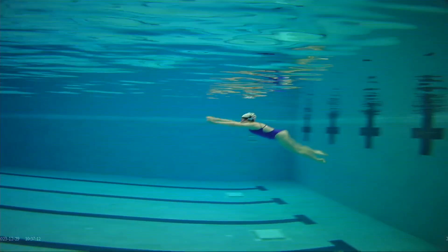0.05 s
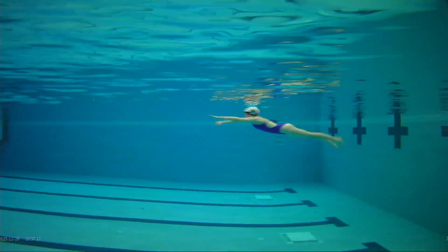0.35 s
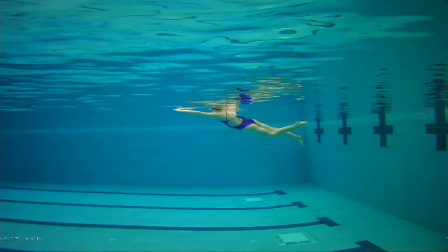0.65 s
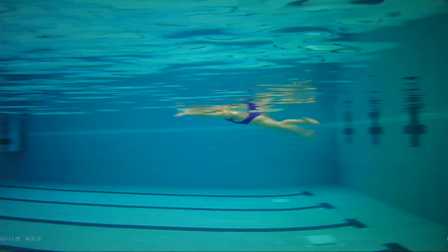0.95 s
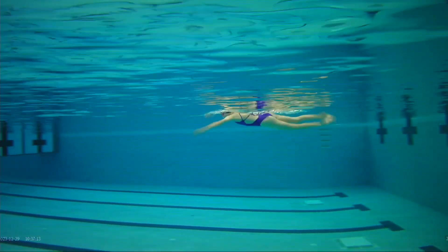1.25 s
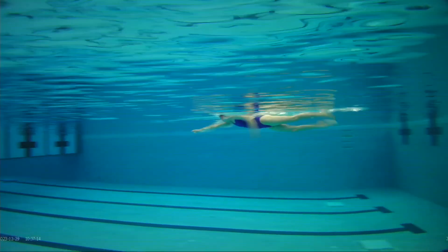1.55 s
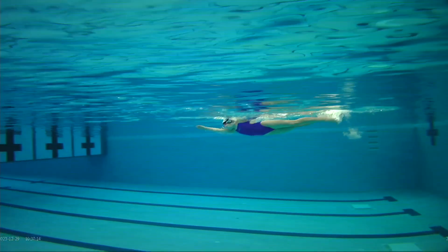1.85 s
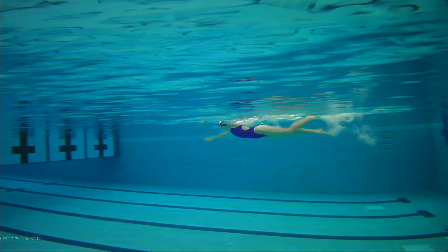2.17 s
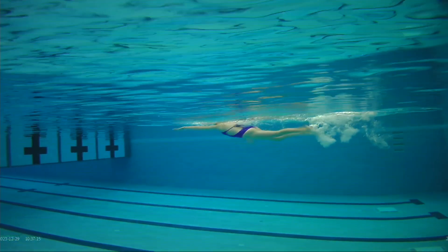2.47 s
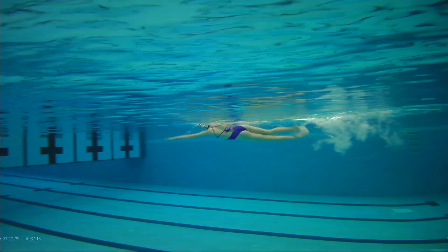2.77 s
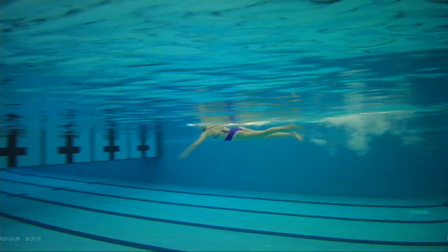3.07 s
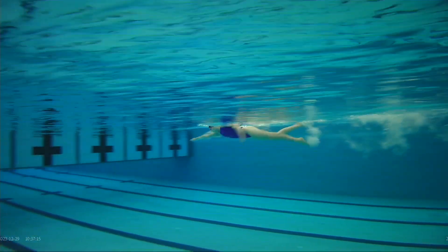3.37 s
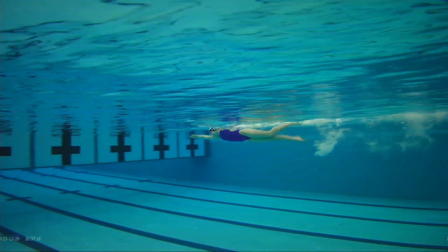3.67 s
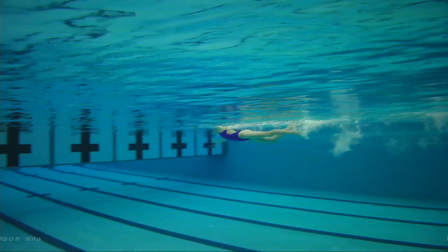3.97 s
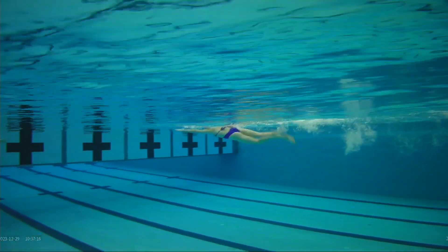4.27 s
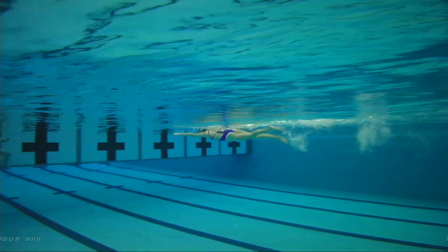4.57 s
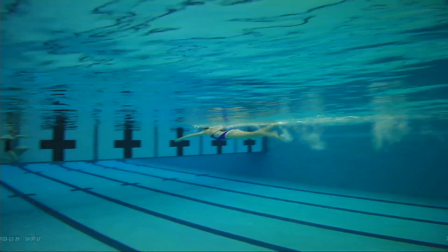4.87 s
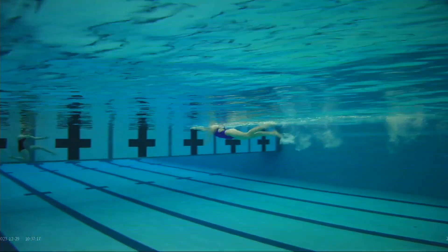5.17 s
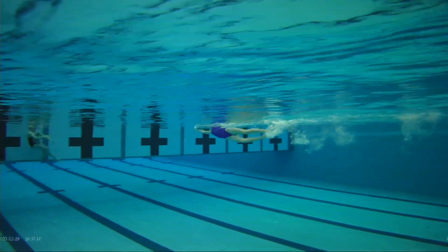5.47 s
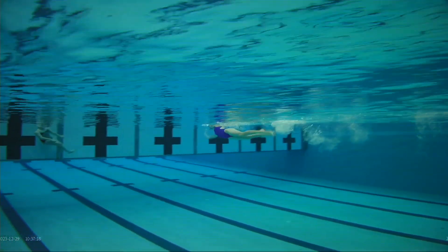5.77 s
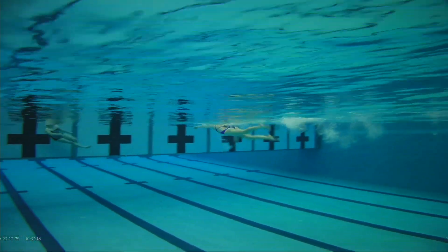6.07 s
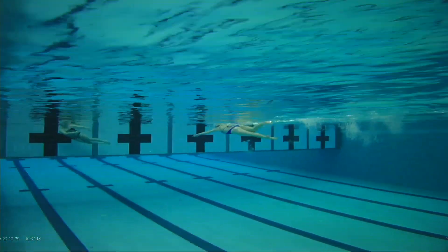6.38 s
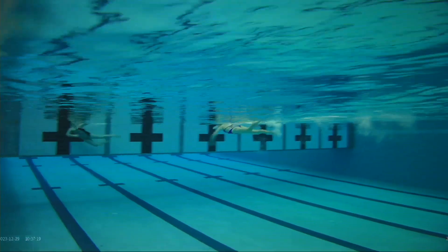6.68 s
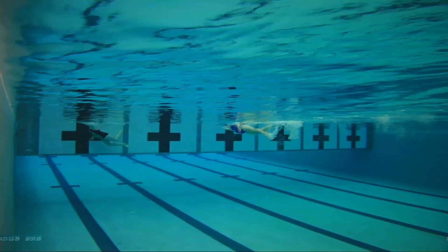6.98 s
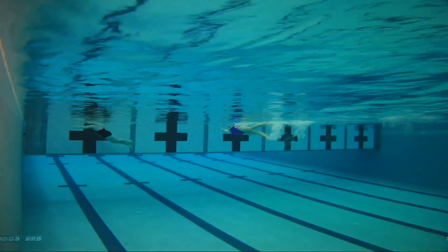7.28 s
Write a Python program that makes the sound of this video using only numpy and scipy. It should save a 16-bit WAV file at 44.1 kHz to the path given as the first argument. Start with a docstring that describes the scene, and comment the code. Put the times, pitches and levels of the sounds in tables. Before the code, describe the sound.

A swimmer's crawl heard from under water, bubbles gulping and fizzing over a low rumble and a wavering pump hum.

```python
"""A low pool rumble and the hum of a circulation pump, heard under water through a camera housing.
The hum swells and fades as the camera drifts. About a second in, a swimmer's crawl starts beating
clouds of ringing bubbles into the water: they gulp, churn, froth and fizz. Kicks slap and leave
air pockets throbbing, small splashes tick at the surface and single large bubbles gloop.
Bubbles and ticks echo round the tiled basin, over a faint camera hiss."""
import sys
import numpy as np
from scipy import signal
from scipy.fft import rfft, irfft, next_fast_len
from scipy.io import wavfile
from scipy.ndimage import map_coordinates

SR = 44100
rng = np.random.default_rng(int(sys.argv[2]) if len(sys.argv) > 2 else 0)


def pcm_store(signal):
    """Save signal as 16-bit PCM."""
    levels = np.round(np.clip(np.atleast_2d(signal), -1, 1) * 32767)
    wavfile.write(sys.argv[1], SR, levels.astype(np.int16).T)


N = 332073

# Tone colour of each noise layer, low to high: frequency_hz, relative_db
SURGE_EQ = [(8, -11.5), (25, 5), (55, -1.5), (90, -4), (200, -44)]
RUMBLE_EQ = [(15, -9), (50, 1), (100, -0.5), (140, -2.5), (200, -4), (285, -4.5), (340, -7), (570, -7.5),
             (720, -14), (1100, -17), (1350, -20), (1800, -21.5), (2500, -30.5), (4000, -36.5),
             (8000, -64.5)]
GULP_EQ = [(60, -21.5), (125, 2.5), (280, 1.5), (325, -5), (420, -1.5), (570, -5.5), (750, -10.5),
           (1500, -41.5)]
CHURN_EQ = [(300, -25.5), (550, -11), (720, -0.5), (920, -0.5), (1080, -5), (1300, -12.5), (2000, -27.5)]
FROTH_EQ = [(700, -20), (1050, -0.5), (1300, 1.5), (1850, -2.5), (2200, -10), (3000, -18.5), (6000, -41)]
SPRAY_EQ = [(1200, 1), (2400, 6), (3200, 3), (4200, -1), (5500, -2), (7000, -3.5), (8000, -20)]
HISS_EQ = [(1000, -5), (4000, -4), (5000, 4), (6300, 5), (7000, -2), (7600, -19.5)]
# Fader ride for water pushing on the housing: time_s, relative_db
SURGE_RIDE = [(0, -47.5), (.9, -50), (1.6, -54), (2.15, -48.5), (2.8, -52.5), (3.4, -53.5), (3.95, -54.5),
              (4.3, -54), (5.75, -49.5), (6.4, -50.5), (7.08, -55), (7.15, -44.5), (7.27, -53.5),
              (7.53, -48.5)]
# Fader rides for the pump's hum and its weaker shaft tone an octave below: time_s, level_db
HUM_RIDE = [(0, -60), (.55, -54.5), (1.06, -49), (1.22, -47), (1.38, -51.5), (1.58, -47.5), (1.74, -60.5),
            (1.87, -49.5), (1.95, -59), (2.16, -43), (2.36, -48.5), (2.54, -46), (2.67, -64), (2.78, -47),
            (3.0, -53.5), (3.14, -50.5), (3.35, -47), (3.95, -47.5), (4.8, -50), (5.02, -63), (5.16, -42.5),
            (5.45, -47.5), (6.1, -60.5), (6.3, -46.5), (6.65, -50.5), (6.78, -58.5), (6.9, -47), (7.1, -52),
            (7.53, -54)]
SHAFT_RIDE = [(0, -58), (1.6, -52.5), (2.15, -53.5), (2.9, -61), (3.7, -51.5), (3.94, -72), (4.1, -52),
              (4.5, -47.5), (4.7, -60), (6.6, -62.5), (7.2, -56), (7.53, -52)]
# Fainter machine tones: pitch_hz, relative_db
WHINES = [(98.5, -60), (119.5, -60), (238, -63), (278, -62), (388, -64), (418, -64), (545, -66), (994, -69),
          (1867, -72.5)]
# Flurries of strokes and kicks, 0 dB being a full flurry:
# start_s, length_s, gulp_db, churn_db, froth_db, spray_db
FLURRY_CUES = [(0.952, 0.49, -15, -17, -10.5, -8), (1.387, 0.23, -10, -4, -7, -2.5),
               (1.588, 0.14, -5, -6, -3.5, -3.5), (1.77, 0.16, -7, -1, -1, -2.5),
               (2.017, 0.18, 1, -1.5, -1, -3), (2.238, 0.18, 0, -3.5, -2.5, -.5),
               (3.006, 0.2, -10.5, -5, -15, -15.5), (3.206, 0.081, -17, -6, -6.5, -5.5),
               (3.298, 0.08, -7.5, 1, 0, -0.5), (3.425, 0.24, -6, -1, -4.5, -3.5),
               (3.74, 0.4, -1.5, -1.5, -4, -5), (4.264, 0.13, -4, -1, -1, -5.5),
               (4.581, 0.11, -8, -12, -10, -3), (4.948, 0.53, -7, -5, -8, -7.5),
               (5.408, 0.12, -8, -6.5, -5.5, -6), (5.975, 0.034, -10, -22, -18, -7.5),
               (6.212, 0.065, -1, -7, -11, -7), (6.758, 0.1, 0.5, 1.5, -.5, -1),
               (6.934, 0.16, 1, -8, -1.5, -1.5), (7.158, 0.098, -3, -6.5, 1.5, -2),
               (7.455, .07, -4, -6, -9, -10)]
# Decay of the basin's echo: frequency_hz, t60_s
BASIN_DECAY = [(100, 0.61), (1000, 0.38), (7000, 0.37)]
# Kicks that trap air: start_s, slap_relative_db, slap_pitch_hz, pocket_db, pocket_pitch_hz, pocket_t60_s
KICK_CUES = [(1.075, -42.5, 800, -56, 137, 0.51), (1.628, -36.5, 237, -41, 139, .2),
             (1.787, -43, 1320, -49, 110, 0.28), (2.049, -34, 403, -38, 69, 0.37),
             (2.115, -41.5, 290, -40, 111, 0.17), (2.325, -41, 740, -48, 136, 0.33),
             (3.35, -43, 880, -41, 72.7, 0.6), (3.384, -44, 467, -40, 152, 0.16),
             (3.595, -40, 290, -44, 138, .3), (3.985, -39, 620, -48, 137, .3),
             (4.283, -38, 600, -63, 77.4, 0.32), (4.36, -43, 710, -54, 75.5, .4),
             (5.184, -36, 248, -48, 129, 0.38), (5.559, -52, 300, -36, 140, 0.49),
             (6.737, -35.5, 269, -63, 132, .3), (6.84, -38.5, 516, -40, 98, 0.43),
             (7.116, -40, 300, -31, 64.5, 0.42), (7.197, -35, 330, -49, 71, .2),
             (7.236, -35, 210, -31.5, 132, 0.25), (7.339, -38, 230, -51, 130, .2)]
# Small splashes at the surface: start_s, pitch_hz, ring_db, crack_db, t60_s
TICK_CUES = [(1.448, 5170, -47, -50, 0.016), (1.48, 4870, -52, -52.5, 0.018),
             (1.49, 5130, -53, -53.5, 0.023), (1.498, 4600, -52.5, -54, .02),
             (1.682, 6920, -55.5, -55.5, 0.017), (1.873, 2300, -45.5, -59, .02),
             (2.249, 3670, -46.5, -47.5, .011), (3.074, 2580, -52, -57.5, .014),
             (3.217, 6520, -54, -49.5, 0.012), (3.268, 6980, -52.5, -64.5, 0.012),
             (4.361, 2090, -46, -52, 0.0094), (5.974, 2410, -52.5, -60, 0.028),
             (6.017, 2420, -50, -53.5, .026), (6.22, 2640, -48.5, -57.5, 0.014),
             (6.25, 2820, -52, -51.5, 0.017)]
# Single large bubbles: start_s, length_s, start_pitch_hz, end_pitch_hz, level_db
GLOOP_CUES = [(1.624, .045, 301, 215, -44.5), (1.665, 0.094, 113, 87, -42.5), (1.85, .06, 1320, 1386, -56),
              (1.965, 0.053, 269, 302, -43), (2.05, 0.047, 411, 550, -49), (2.14, .04, 304, 324, -49),
              (2.415, .035, 308, 340, -45), (3.342, 0.04, 790, 1050, -50), (3.39, 0.041, 480, 442, -42.5),
              (4.445, 0.021, 560, 493, -49), (6.8, 0.067, 468, 586, -48.5), (7.102, 0.074, 324, 167, -41.5),
              (7.145, 0.035, 326, 470, -43.5)]

SHAFT_HZ = 69.4
RISE_S, CLEAR_DB_PER_S = 0.049, 27.5  # a bubble cloud builds quickly and thins as it surfaces
LINGER_DB, LINGER_DB_PER_S = -13, 0.5  # a small share of it hangs in the water
TICK_WIDTH_HZ = 150  # a splash is a knot of bubbles of nearly one size
BAND_LIMIT_HZ = 7650


def amp(db):
    """Decibels to gain."""
    return 10 ** (np.asarray(db) / 20)


def unit(x):
    """Scale to rms 1."""
    return x / np.sqrt(np.mean(x ** 2) + 1e-20)


def along(points, hz):
    """Read (frequency_hz, value) points on a log frequency axis."""
    knots_hz, values = np.transpose(points)
    return np.interp(np.log(hz + 1), np.log(knots_hz + 1), values)


def fader(ride):
    """A fader ride in dB, one value per sample."""
    return np.interp(np.arange(N) / SR, *np.transpose(ride))


def wobble(rate):
    """A smooth random curve, rate knots a second."""
    return map_coordinates(rng.standard_normal(400), [np.arange(N) * rate / SR + 2], mode="mirror")


def filtered(x, response):
    """Filter x by a gain that depends on frequency."""
    size = next_fast_len(N + 8192)
    return irfft(rfft(x, size) * response(np.fft.rfftfreq(size, 1 / SR)), size)[:N]


def coloured(x, eq):
    """x through an EQ curve, at rms 1."""
    return unit(filtered(x, lambda hz: amp(along(eq, hz))))


def add(track, start_s, sound):
    """Lay a sound into the track at its cue."""
    part = track[max(round(start_s * SR), 0):][:len(sound)]
    part += sound[:len(part)]


def water():
    """The bed: steady rumble of the whole pool, and slow surges against the housing."""
    rumble = amp(-46.5) * coloured(rng.standard_normal(N), RUMBLE_EQ)
    surge = amp(fader(SURGE_RIDE) - 1.0) * coloured(rng.standard_normal(N), SURGE_EQ)
    return rumble + surge


def tone(hz, drift_hz):
    """A machine tone of rms 1 whose pitch wanders in the moving water."""
    turns = rng.random() + np.cumsum(hz + drift_hz * wobble(7)) / SR
    return np.sqrt(2) * np.sin(2 * np.pi * turns)


def pump():
    """The pump hums at twice its shaft rate, swelling as the camera drifts through standing waves."""
    shaft = amp(fader(SHAFT_RIDE) + 0.5 * wobble(8)) * tone(SHAFT_HZ, drift_hz=2.5)
    hum = amp(fader(HUM_RIDE) + 2.0 * wobble(13)) * tone(2 * SHAFT_HZ, drift_hz=2.8)
    whine = sum(amp(db - 5.0 + 4.1 * wobble(3)) * tone(hz, drift_hz=0.97) for hz, db in WHINES)
    return shaft + hum + whine


def flurry(start_s, length_s):
    """Power envelope of one bubble cloud: it builds, holds while the limbs work, then clears."""
    age_s = np.arange(N) / SR - start_s
    release_s = np.maximum(age_s - length_s, 0)
    clearing = amp(-CLEAR_DB_PER_S * release_s) ** 2
    lingering = amp(LINGER_DB - LINGER_DB_PER_S * release_s) ** 2
    return np.clip(age_s / RISE_S, 0, 1) * (clearing + lingering)


def bubbles(low_hz, high_hz, q, spread_db, glide, count, samples):
    """Scattered ringing bubbles, each gliding up as it nears the surface."""
    when, pitch_draw, gain_draw = rng.random((count, 3)).T[:, :, None]
    hz = low_hz * (high_hz / low_hz) ** pitch_draw
    turns = hz * np.arange(samples) / SR
    age = turns / q
    ring = np.sin(2 * np.pi * turns * (1 + glide * age)) * np.exp(-np.pi * age)
    spread = np.minimum(-np.log(1 - gain_draw), np.pi)  # exponential, capped
    gain = amp(spread_db * spread) * hz / low_hz
    positions = (when * N).astype(int) + np.arange(samples)
    return unit(np.bincount(positions.ravel(), (gain * ring).ravel(), N)[:N])


def basin(x, wet_db):
    """Sound bounces between the tiles and a surface that keeps moving, so the echo keeps changing."""
    wet, block = np.zeros(N), SR // 10
    for start in range(0, N, block):
        hz, t, noise = signal.stft(rng.standard_normal(SR // 4), SR, nperseg=256)
        decay = amp(-60 * t / along(BASIN_DECAY, hz)[:, None])
        _, tail = signal.istft(noise * decay, SR, nperseg=256)
        add(wet, start / SR, signal.fftconvolve(x[start:start + block], tail / np.linalg.norm(tail)))
    return x + amp(wet_db) * wet


def cloud(near, eq, wash_db):
    """Near bubbles echo round the basin and stand out of a wash of countless far ones."""
    echoing = unit(basin(near, wet_db=-0.5))
    return coloured(echoing + amp(wash_db) * rng.standard_normal(N), eq)


def swell(power, calm_db, flurry_db):
    """Gain of a bubble layer: the flurries add their power to that of calm water."""
    return np.sqrt(amp(calm_db) ** 2 + amp(flurry_db) ** 2 * power)


def wake():
    """Each stroke drags air down: pockets gulp, bubbles churn and froth, spray fizzes."""
    gulp_power, churn_power, froth_power, spray_power = sum(
        np.outer(amp(levels_db) ** 2, flurry(start_s, length_s))
        for start_s, length_s, *levels_db in FLURRY_CUES)
    large = bubbles(111.6, 704, q=9.4, spread_db=-2.0, glide=0.031, count=1800, samples=2600)
    gulps = cloud(large, GULP_EQ, wash_db=-7.0) * swell(gulp_power, calm_db=-53, flurry_db=-50.5)
    medium = bubbles(500, 1402, q=15, spread_db=-0.5, glide=0.073, count=2000, samples=1400)
    churn = cloud(medium, CHURN_EQ, wash_db=-0.5) * swell(churn_power, calm_db=-69, flurry_db=-55.5)
    small = bubbles(1000, 3000, q=20, spread_db=0.0, glide=0.021, count=3000, samples=1100)
    froth = cloud(small, FROTH_EQ, wash_db=3.0) * swell(froth_power, calm_db=-66.5, flurry_db=-58)
    tiny = bubbles(1800, 7500, q=24, spread_db=1.0, glide=0.0027, count=7000, samples=650)
    spray = cloud(tiny, SPRAY_EQ, wash_db=6.5) * swell(spray_power, calm_db=-72, flurry_db=-60)
    return gulps + churn + froth + spray


def kicks():
    """A limb slaps the water and leaves an air pocket throbbing."""
    track, t = np.zeros(N), np.arange(SR // 2) / SR
    for start_s, slap_db, slap_hz, pocket_db, pocket_hz, pocket_t60_s in KICK_CUES:
        noise = rng.standard_normal(N)
        band = unit(filtered(noise, lambda hz: 1 / (1 + ((hz - slap_hz) / (0.34 * slap_hz)) ** 4)))
        splash = 0.44 * band[:len(t)] * amp(-60 * t / 0.28)
        knock = 0.21 * np.sin(2 * np.pi * slap_hz * t) * amp(-60 * t / 0.12)
        slap = (knock + splash) * (1 - np.exp(-t / 0.0028))
        pocket_envelope = amp(-60 * t / pocket_t60_s) * (1 - np.exp(-t / 0.012))
        pocket = np.sin(2 * np.pi * pocket_hz * t) * pocket_envelope
        add(track, start_s, amp(slap_db) * slap + amp(pocket_db) * pocket)
    return track


def ticks():
    """Small splashes crack, ring roughly for a few milliseconds and echo round the basin."""
    track, t = np.zeros(N), np.arange(SR // 10) / SR
    for start_s, pitch_hz, ring_db, crack_db, t60_s in TICK_CUES:
        crack, scatter = rng.standard_normal((2, len(t)))
        phase_blur = np.cumsum(scatter) * np.sqrt(2 * np.pi * TICK_WIDTH_HZ / SR)
        ring = np.sin(2 * np.pi * pitch_hz * t + phase_blur)
        add(track, start_s, (amp(ring_db) * ring + amp(crack_db) * crack) * amp(-60 * t / t60_s))
    return basin(track, wet_db=-2.5)


def gloops():
    """A large bubble swells and fades, its pitch sliding as it changes depth."""
    track = np.zeros(N)
    for start_s, length_s, start_hz, end_hz, level_db in GLOOP_CUES:
        progress = np.linspace(0, 1, int(length_s * SR))
        turns = np.cumsum(start_hz + (end_hz - start_hz) * progress) / SR
        envelope = np.sin(np.pi * progress ** 0.7)
        add(track, start_s, amp(level_db) * np.sin(2 * np.pi * turns) * envelope)
    return basin(track, wet_db=-13.5)


def scene():
    """The mono mix of everything that reaches the housing."""
    return (water() + pump() + wake() + kicks() + gloops() + ticks())[None]


def record(dry):
    """The camera adds its own hiss and keeps nothing above its band limit."""
    hiss = amp(-70.5) * coloured(rng.standard_normal(N), HISS_EQ)
    return filtered(dry[0] + hiss, lambda hz: hz < BAND_LIMIT_HZ)[None]


dry = scene()
out = record(dry)
pcm_store(out)
```